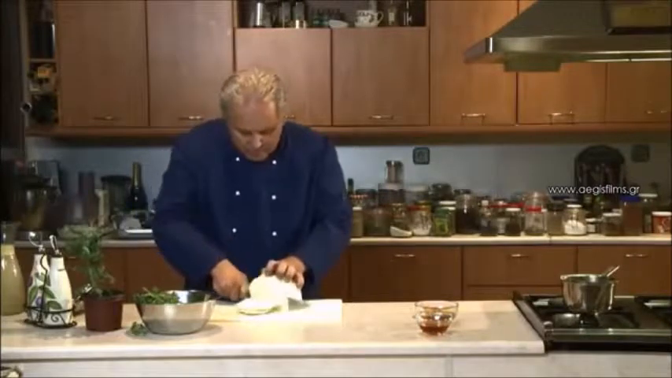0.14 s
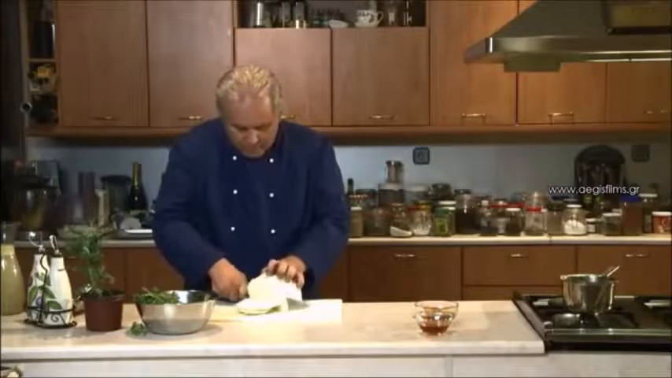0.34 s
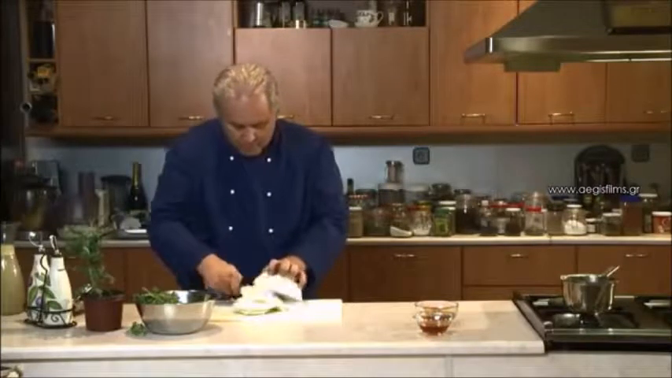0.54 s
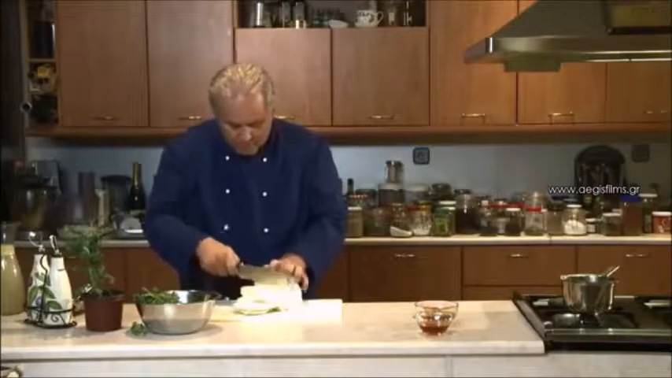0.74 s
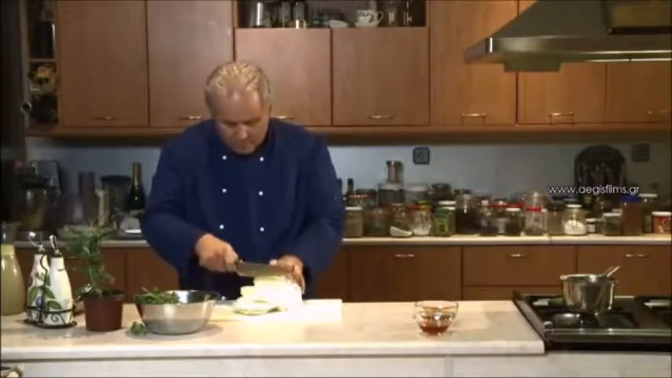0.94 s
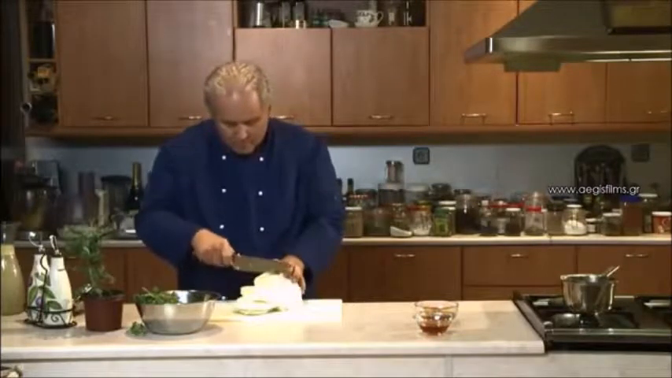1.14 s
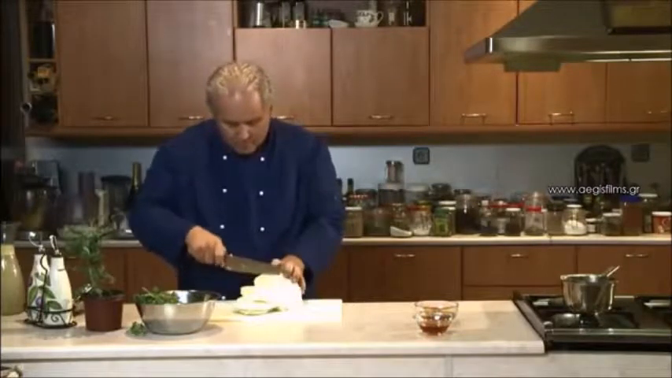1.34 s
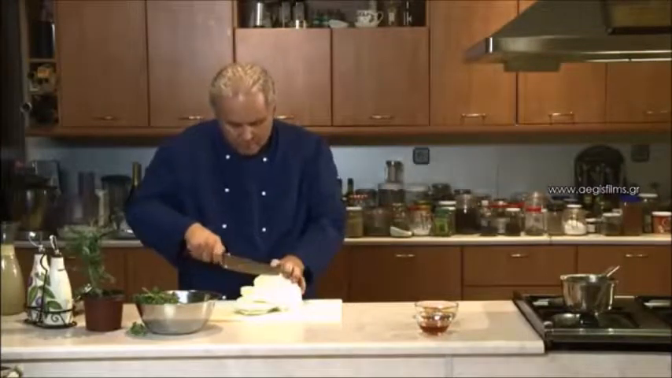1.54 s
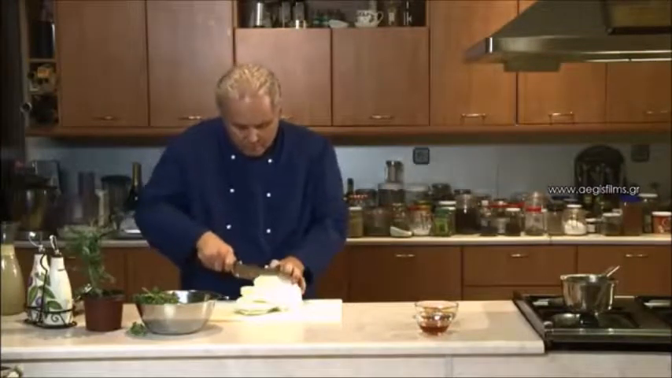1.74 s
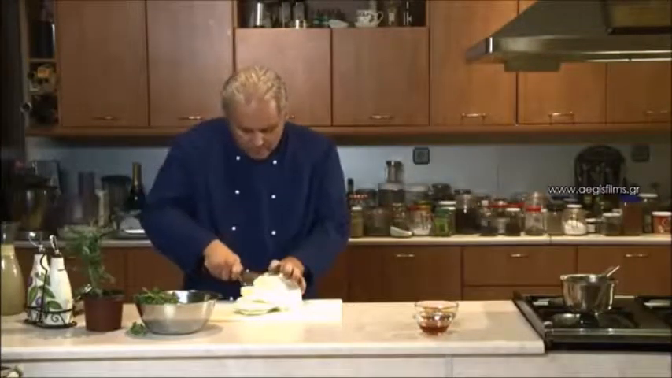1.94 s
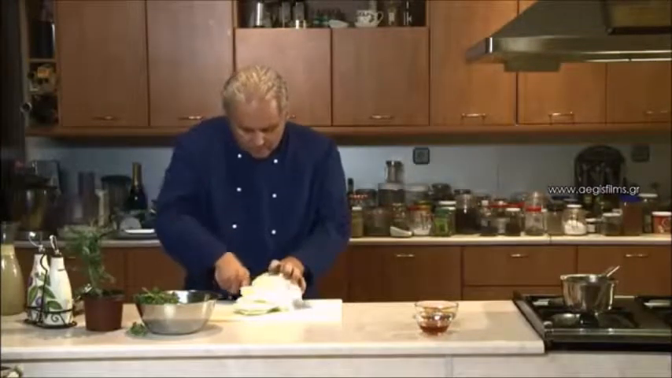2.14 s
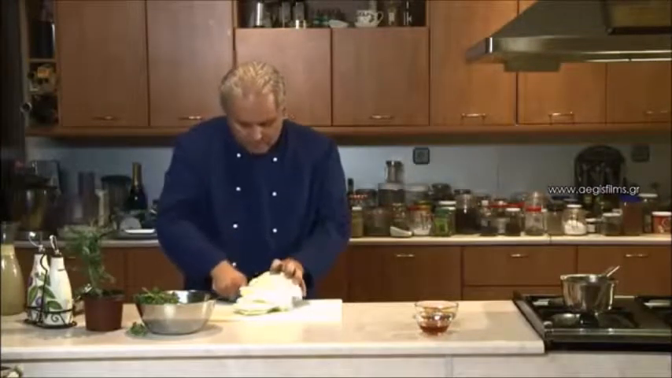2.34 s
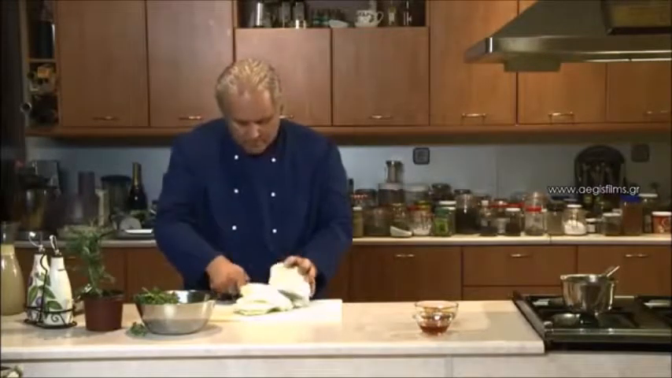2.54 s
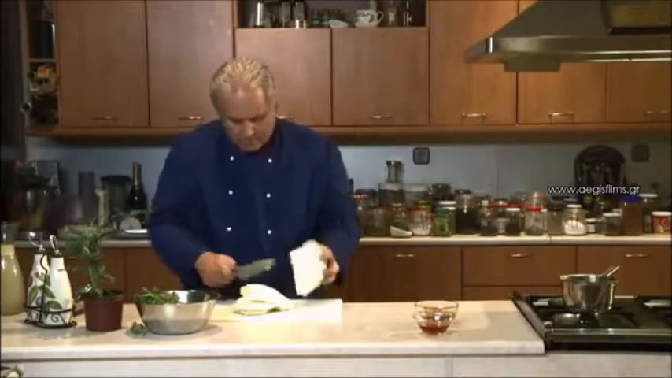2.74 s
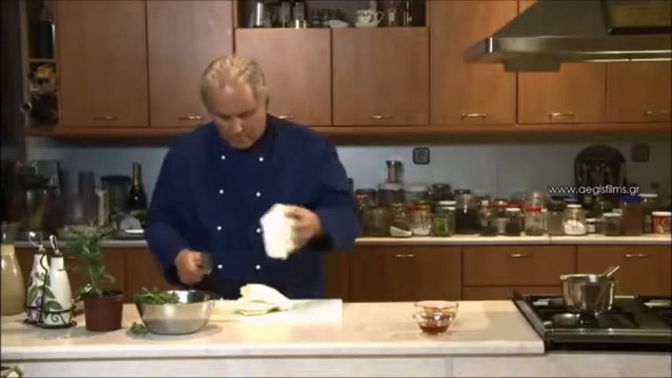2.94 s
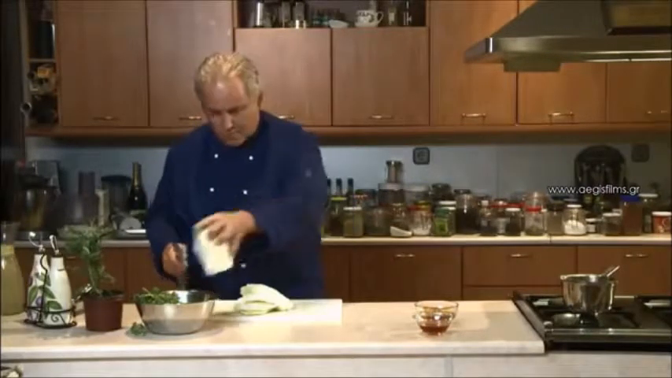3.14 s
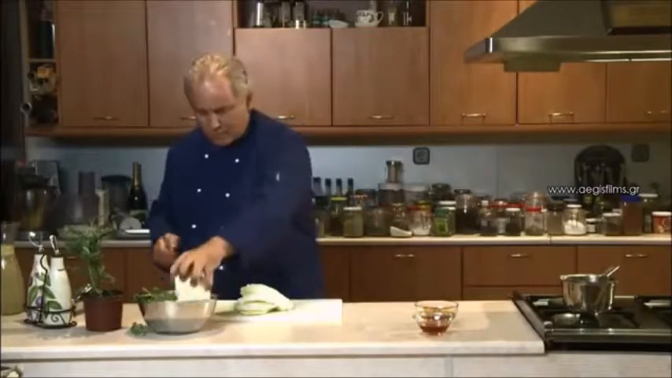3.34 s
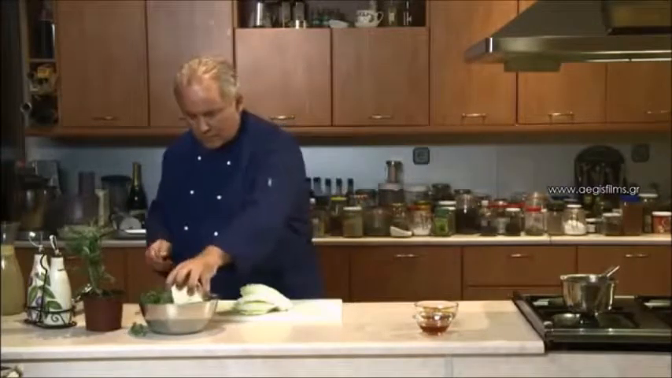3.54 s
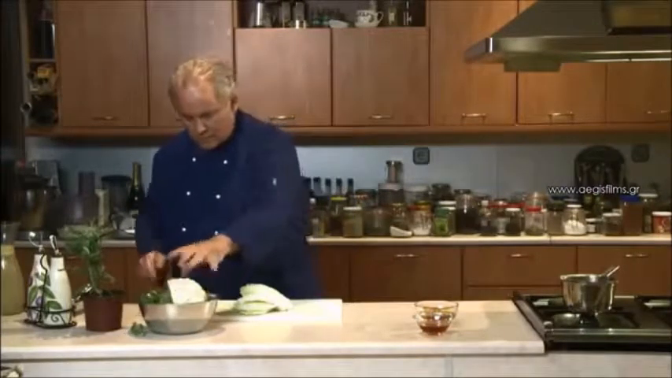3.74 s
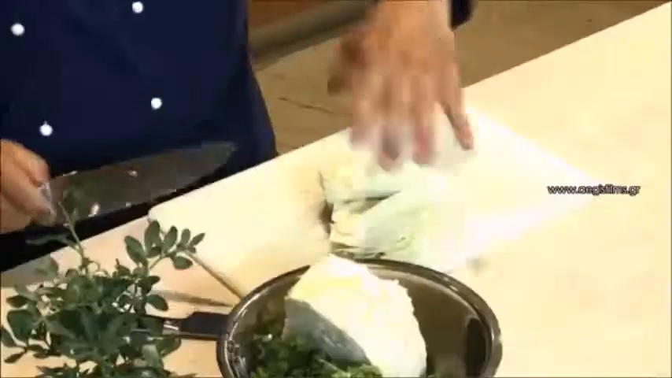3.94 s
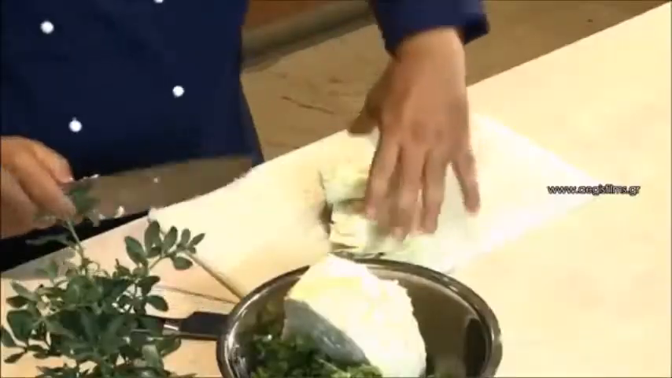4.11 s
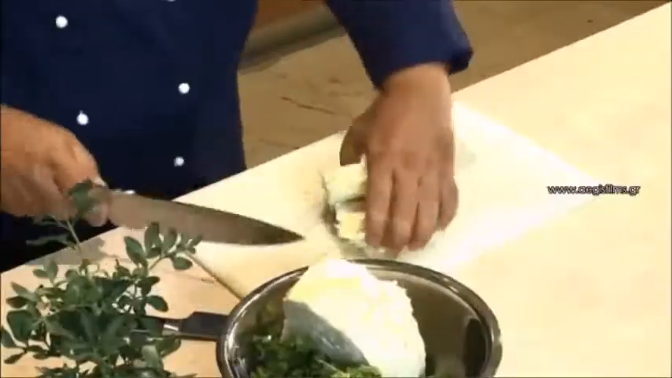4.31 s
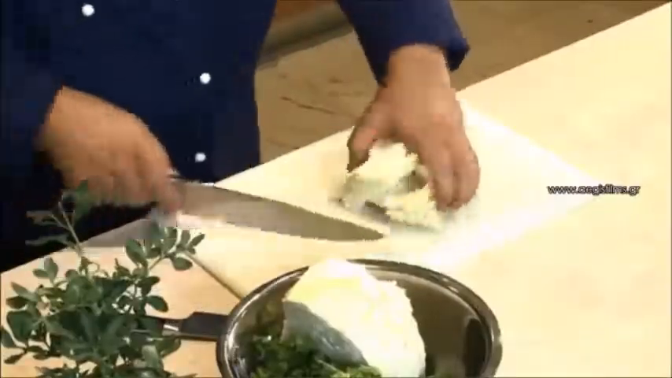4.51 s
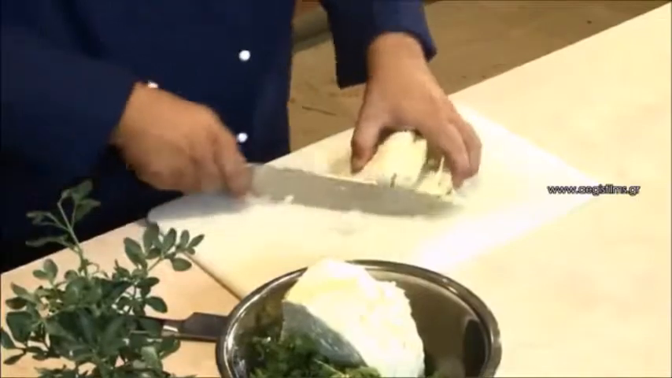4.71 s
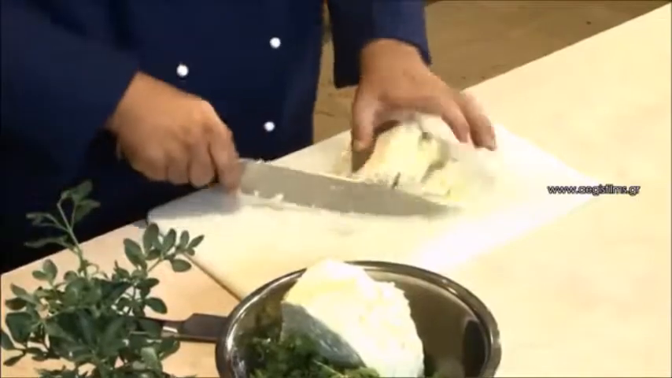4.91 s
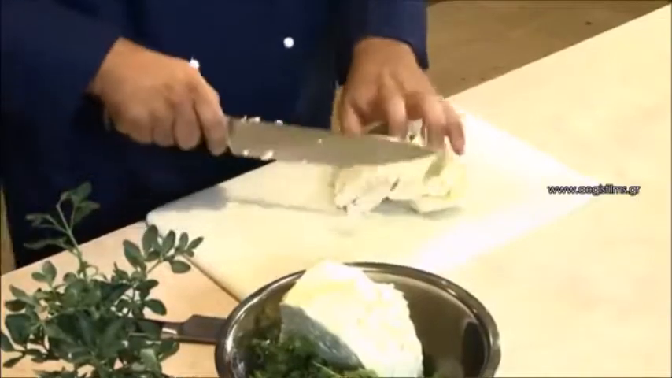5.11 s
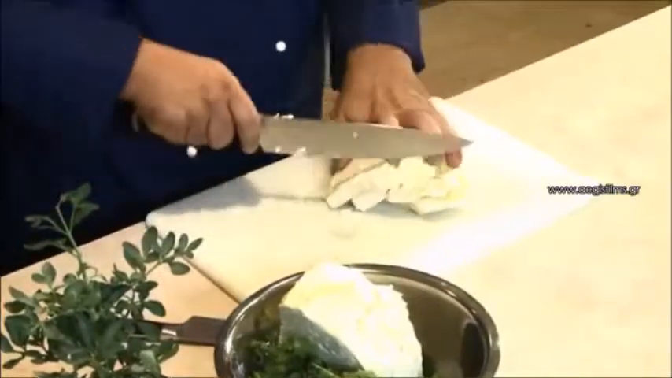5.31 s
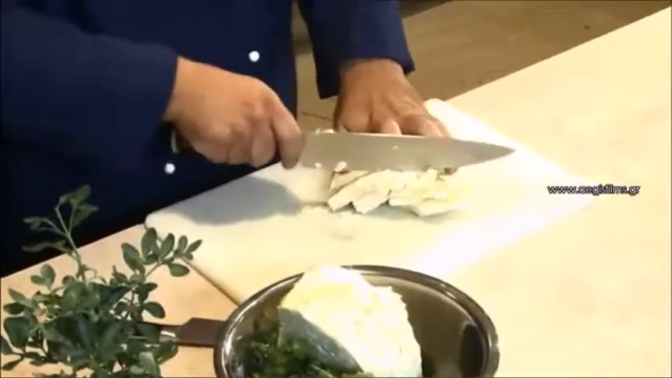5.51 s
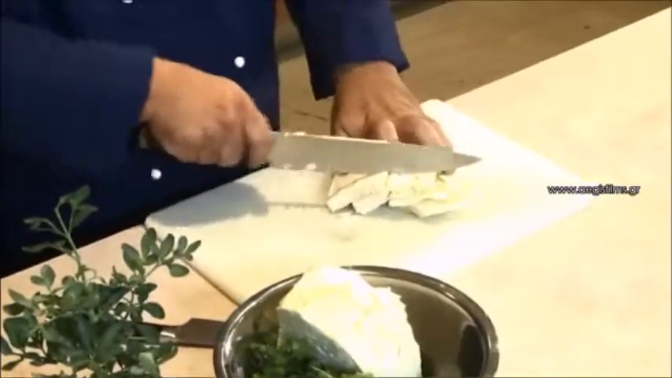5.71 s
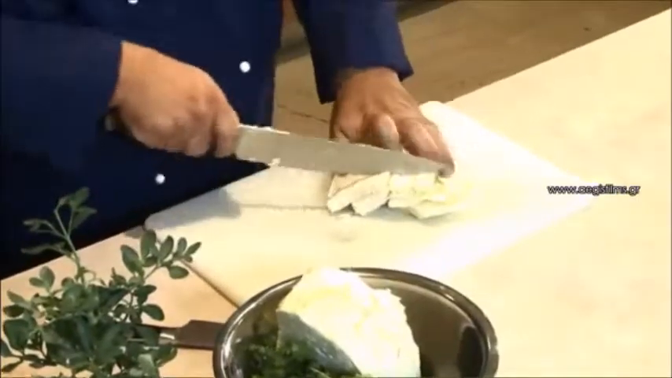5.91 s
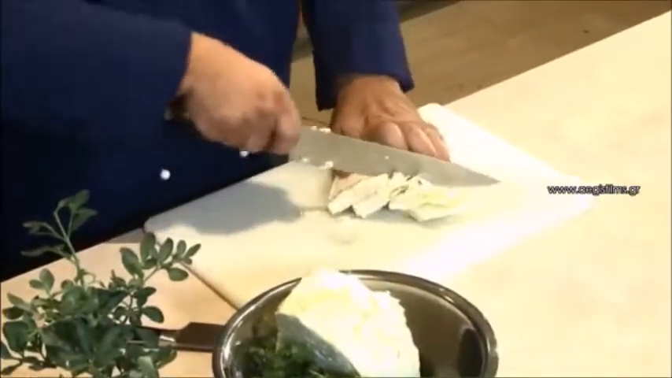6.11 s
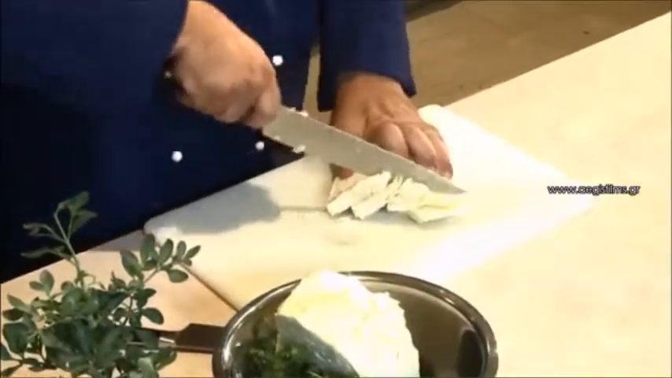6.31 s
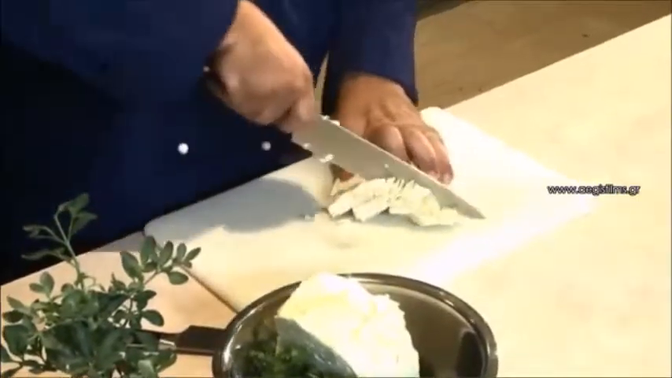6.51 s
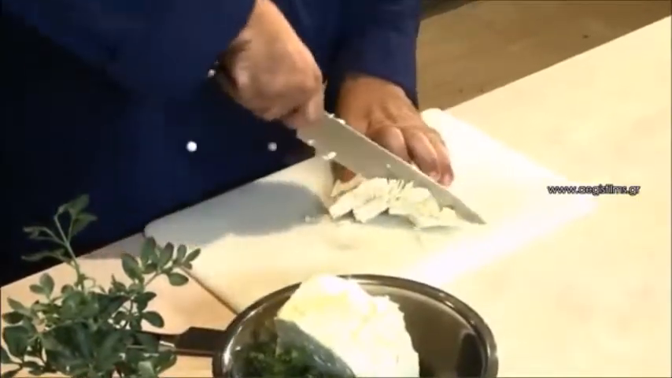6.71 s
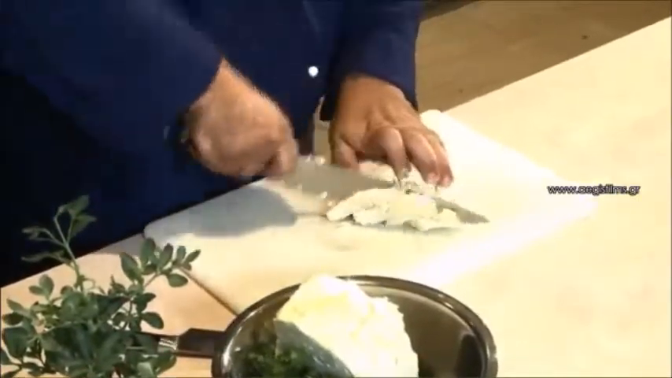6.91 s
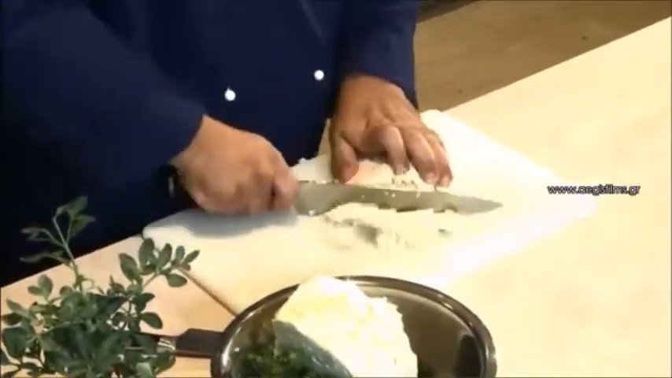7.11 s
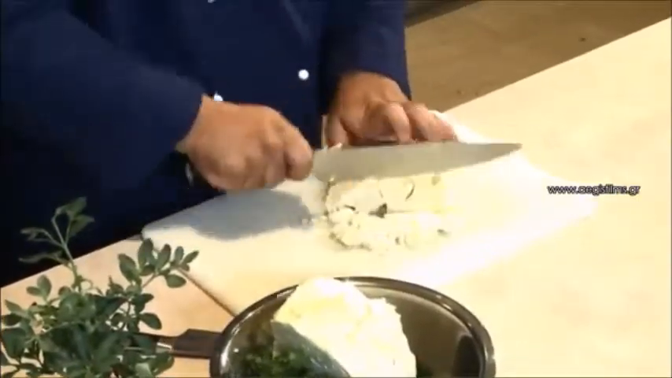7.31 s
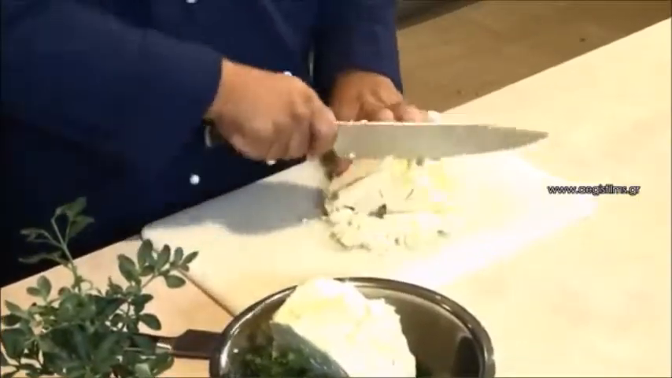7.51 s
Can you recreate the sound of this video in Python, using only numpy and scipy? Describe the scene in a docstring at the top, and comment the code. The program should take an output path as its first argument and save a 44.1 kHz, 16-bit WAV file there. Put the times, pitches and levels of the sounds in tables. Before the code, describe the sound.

A large knife tears crisply into a cabbage and knocks hard on the cutting board, then a longer crunching cut ends in a second, sharper knock. A chunk lands in a steel bowl with a dull, briefly ringing clunk. Lighter slicing follows, with leafy crackle, small snaps and soft bumps. One microphone in a reverberant kitchen hears steady low ventilation noise and faint hum.

```python
"""Crunching cuts through a cabbage, two knocks on a board, a chunk dropped in a steel bowl, lighter slicing.
Crackle, tearing, snaps and blade taps are filtered noise bursts; strokes pace the cutting. Knocks add a short
swing, board clicks and blade modes. The bowl is thuds, leaf crackle and decaying modes; bumps are tuned noise.
A lively kitchen adds echoes and a tail; ventilation noise, a faint hum and a low drone fill the room."""
import sys
import numpy as np
from scipy import signal
from scipy.fft import rfft, irfft
from scipy.io import wavfile

SR = 44100
rng = np.random.default_rng(int(sys.argv[2]) if len(sys.argv) > 2 else 0)


def to_wav(s):
    """Save 16-bit WAV."""
    ch = np.atleast_2d(s).T  # columns
    pcm = np.round(np.clip(ch, -1, 1) * 32767)  # PCM
    wavfile.write(sys.argv[1], SR, pcm.astype(np.int16))


N = 332955  # samples

# Ventilation spectrum. Each row: frequency in Hz, relative level in dB.
AIR_SPECTRUM = [(12, -41), (20, -10.5), (48, -3), (70, -12.5), (102, -9.5), (127, -12.5), (166, -5),
                (261, -10), (446, -11), (538, -14), (583, -16), (826, -17.5), (1230, -19), (4960, -41),
                (12000, -46), (15600, -80), (22000, -120)]
# Hum partials. Each row: frequency in Hz, rms level in dB.
HUM_PARTIALS = [(48.7, -63), (100, -71), (166.5, -67), (285, -68.5)]
# Room decay. Each row: frequency in Hz, t60 in seconds.
KITCHEN_T60 = [(100, 0.96), (300, 0.97), (600, 0.65), (1200, 0.64), (2500, 0.65), (5000, 0.58),
               (10000, 0.39)]
# Counter, cupboards and walls. Each row: delay in seconds, relative gain as a ratio.
ECHO_TAPS = [(.0047, .2), (0.0095, 0.3), (0.021, 0.23), (0.026, 0.11), (.058, .12)]
# Edge or hand moving through the leaves. Each row: start in seconds, length in seconds, relative crackle
# at the start in dB, at the end in dB, tearing over crackle in dB before the lean, vein snaps over crackle in dB.
STROKE_TABLE = [ (-0.03, 0.23, -54, -54.5, 5, 20), (0.476, 0.14, -62, -67, 4, 19),
                (1.65, 0.64, -54, -52.5, 3.5, 22), (3.122, 0.26, -71.5, -74.5, 4.5, 20),
                (4.122, 0.72, -73.5, -61.5, 5, 25.5), (4.684, 0.13, -67, -62.5, -16, 30),
                (5.39, 0.061, -69, -53, 0, 18), (5.571, 0.14, -63, -63.5, 2, 25),
                (5.712, 0.39, -58, -72, 3, 22), (6.031, 0.46, -55, -60, -1, 22),
                (6.52, 0.15, -53, -48.5, -5, 20), (6.69, 0.1, -72, -65, -2, 22),
                (6.88, 0.21, -57, -44, 3.5, 22), (7.145, 0.21, -73, -65, 2.5, 24)]
# Thick ribs snapping; at 4.66 and 4.71 s the knife blade taps the board. Each row: start in seconds,
# level in dB before SNAP_GAIN_DB, tearing-coloured part over crackle part in dB, ring pitch in Hz.
SNAP_TABLE = [(0.4928, -44, 10, 3320), (0.5364, -37, 11, 3320), (1.4351, -47, 3, 9870),
              (1.755, -36, -2, 8950), (1.763, -34, -2, 9040), (1.7714, -33, -2, 8850),
              (1.7878, -40, -9, 3000), (1.7941, -27, 1, 7740), (1.956, -34.5, -2, 3240),
              (4.6138, -41.5, -2, 3250), (4.6636, -41.5, -7, 8070), (4.706, -38, -15, 4270),
              (4.8618, -37, 1, 8800), (4.9931, -48, 7, 3820), (5.5877, -44, 1, 5860),
              (5.652, -41, -5, 7840), (5.7952, -41.5, 5, 4190), (6.4388, -33.5, -6, 9850),
              (6.4422, -34, 2, 8900), (6.4768, -42, -4, 3200), (6.5593, -43, -7, 3300),
              (6.68, -39, -1, 9350), (6.8949, -35.5, -3, 9300), (6.9183, -36, -3, 9400),
              (7.0464, -34, 6, 3260), (7.078, -40, 0, 3230)]
# Leaf crackle spectrum. Each row: frequency in Hz, relative level in dB.
CRACKLE_SPECTRUM = [(1500, -17), (3500, -1.5), (5000, -1.5), (7000, -1), (9000, 4.5), (10500, 0),
                    (12000, -4)]
# Leaf tearing spectrum. Each row: frequency in Hz, relative level in dB.
TEARING_SPECTRUM = [(100, -32), (300, -4), (700, -3), (1700, 1.5), (2400, 2), (3400, -1), (5000, -7),
                    (7000, -12.5), (11000, -14.5)]
# Blade breaking through to the board. Each row: start in seconds, relative blow in dB, clack over board
# in dB, relative blade chatter in dB, downward push as a share of the swing, swing pitch in Hz.
KNOCK_TABLE = [(0.2096, 8.5, -12, -11, 0.02, 700), (2.2558, 11, -4, -24, 0.11, 790)]
# Board body spectrum. Each row: frequency in Hz, relative level in dB.
BOARD_SPECTRUM = [(30, -47), (100, -23.5), (160, -16.5), (350, -11.5), (500, -3.5), (620, -2), (850, -0.5),
                  (1150, -6), (1600, -5.5), (2400, -16.5), (3500, -33.5), (6000, -44.5), (12000, -56)]
# Hard clack spectrum. Each row: frequency in Hz, relative level in dB.
CLACK_SPECTRUM = [(500, -25), (1400, 1), (2300, -1), (3300, -11.5), (5000, -24), (12000, -25)]
# Edge-on-board crack spectrum. Each row: frequency in Hz, relative level in dB.
CRACK_SPECTRUM = [(500, -2), (1500, -7), (2200, 14.5), (3500, -13.5), (6000, -18), (9000, -21),
                  (12000, -47)]
# Steel blade modes. Each row: frequency in Hz, relative level in dB, t60 in seconds.
BLADE_MODES = [(4122, -9, .3), (5198, -9, .42), (6468, -14, .35), (7337, -4, .15), (7696, -5, .24),
               (9070, 0, .1), (9170, -3, .16), (9862, -7, .14), (10750, -8, .18), (11400, -2, .09),
               (11560, -1, .09)]
# Chunk landing in the bowl. Each row: start in seconds, relative thud in dB, relative bowl ring in dB,
# relative leaf crackle in dB, contact decay time in seconds.
DROP_TABLE = [(3.44, -44, -29, -28.5, 0.0035), (3.467, -14, -28, -34, 0.016),
              (3.485, -4.5, -10.5, -19, 0.0086), (3.56, -11.5, -19, -18, 0.0093),
              (3.595, 6.5, -7.5, -8.5, 0.0057), (3.6032, 6.5, 6, -10.5, 0.0067)]
# Chunk thud spectrum. Each row: frequency in Hz, relative level in dB.
CHUNK_SPECTRUM = [(30, -53), (70, -23), (140, -13), (220, -2.5), (310, -0.5), (400, -7), (600, -2.5),
                  (800, -5), (1050, -6.5), (1700, -10.5), (2200, -21.5), (3200, -27), (4700, -47),
                  (12000, -49)]
# Steel bowl modes. Each row: frequency in Hz, relative level in dB, t60 in seconds before leaf damping.
BOWL_MODES = [(229, -4, .45), (260, -9, .3), (319, -3, .4), (369, -7, .3), (598, -4, .45), (621, 0, .45),
              (1094, 0, .25), (1254, -7, .28), (1421, -3, .28), (1645, -6, .28), (4330, -14, .04),
              (6072, -9, .09), (7644, -12, .06), (8156, -11, .07), (9168, -10, .05), (11440, -7, .06)]
# Soft bumps on the board. Each row: start in seconds, relative level in dB, decay time in seconds,
# pitch in Hz, tone width as a ratio.
BUMP_TABLE = [(4.744, -15.5, .025, 300, 3.3), (4.769, -19, 0.015, 840, 1.8), (5.182, -13, 0.011, 930, 1.6),
              (6.677, -18, 0.013, 453, 4.3), (6.919, -8, 0.02, 416, 1.9), (6.996, -7.5, 0.018, 604, 1.4),
              (7.045, -7.5, 0.018, 710, 2.16), (7.05, -14.5, .033, 235, 1.47)]

AIR_RMS_DB = -54.5
DRONE_HZ, DRONE_RMS_DB, DRONE_HOLD_S = 36.2, -56, 0.92
DRONE_FADE_DB_PER_S, DRONE_REST_RMS_DB = 11, -83
BITE_SHARE, RELEASE_S = 0.15, 0.019  # share of a stroke spent sinking in; decay after it
LEAN_DB, LEAN_S = 10.5, 0.072  # extra tearing as the cook leans on the knife; decay either side of a knock
SNAP_GAIN_DB, SNAP_DECAY_S = 12.5, 0.0021
SNAP_RING_DB, SNAP_RING_DECAY_S = -5.5, 0.0021  # level against the crackle part
VEINS_PER_S, VEIN_SPREAD_DB, VEIN_DEEP_DB, VEIN_RANGE_HZ = 30, 3, -7.5, (3000, 11250)
THUMP_HZ, THUMP_WIDTH_RATIO = 275, 1.55
THUMP_DB, THUMP_DECAY_S = -4.5, 0.0094  # level against the thud
LEAF_DAMPING_DB_PER_S = 40
CEILING, CUTOFF_HZ = 0.44, 11920


def amp(db):
    """Decibels to gain."""
    return 10 ** (np.asarray(db) / 20)


def evened(x):
    """Scales to rms 1."""
    return x / np.sqrt(np.mean(x ** 2) + 1e-20)


def unit(x):
    """Scales to energy 1."""
    return x / (np.linalg.norm(x) + 1e-20)


def read(points, hz):
    """Interpolates a table on a log-frequency axis."""
    table_hz, value = np.transpose(points)
    return np.interp(np.log(hz + 1), np.log(table_hz + 1), value)


def add(mix, start_s, sound):
    """Mixes a sound in at start_s, cut at the end of the mix."""
    part = mix[max(round(start_s * SR), 0):][:len(sound)]
    part += sound[:len(part)]


def through(x, response):
    """Passes x through an impulse response."""
    return signal.fftconvolve(x, response)[:N]


def click(spectrum, size=4096):
    """Minimum-phase click with this spectrum: its energy comes as early as possible."""
    log_gain = np.log(amp(read(spectrum, abs(np.fft.fftfreq(size, 1 / SR)))))
    minimum_phase = np.exp(np.conj(signal.hilbert(log_gain)))
    return unit(np.fft.ifft(minimum_phase).real[:size // 2])


def burst(decay_s):
    """Ragged contact: exponentially decaying noise."""
    t = np.arange(0, 6 * decay_s, 1 / SR)
    return unit(rng.standard_normal(len(t)) * np.exp(-t / decay_s))


def ring(modes):
    """Struck object: decaying sine modes with random phases."""
    t = np.arange(SR // 2) / SR
    out = np.zeros(len(t))
    for hz, db, t60_s in modes:
        out += amp(db - 60 * t / t60_s) * np.sin(2 * np.pi * (hz * t + rng.random()))
    return unit(out)


def kitchen(wet_db, early_db):
    """Room response: a few distinct echoes and a dense noise tail whose treble dies first."""
    hz, t, bins = signal.stft(rng.standard_normal(SR), SR, nperseg=256)
    decay = amp(-60 * t / read(KITCHEN_T60, hz)[:, None])
    tail = signal.istft(bins * decay, SR, nperseg=256)[1]
    fade_in = np.minimum(np.arange(len(tail)) / SR / 0.0048, 1)
    tail = amp(wet_db) * unit(tail * fade_in)
    for delay_s, gain in ECHO_TAPS:
        add(tail, delay_s, np.array([gain * amp(early_db)]))
    return tail


def room_tone():
    """Shaped ventilation noise, a phase-wavering hum and a low drone that holds, then sinks to a faint rest."""
    t = np.arange(N) / SR
    gain = amp(read(AIR_SPECTRUM, np.fft.rfftfreq(N, 1 / SR)))
    air = evened(irfft(rfft(rng.standard_normal(N)) * gain, N))
    out = amp(AIR_RMS_DB) * air
    knots_s = np.linspace(0, t[-1], num=30)
    for hz, db in HUM_PARTIALS:
        waver = np.interp(t, knots_s, rng.standard_normal(len(knots_s)))
        out += amp(db) * np.sqrt(2) * np.sin(2 * np.pi * hz * t + 0.5 * waver)
    fade_db = DRONE_FADE_DB_PER_S * np.maximum(t - DRONE_HOLD_S, 0)
    drone_db = np.maximum(DRONE_RMS_DB - fade_db, DRONE_REST_RMS_DB)
    return out + amp(drone_db) * np.sqrt(2) * np.sin(2 * np.pi * DRONE_HZ * t)


def strokes():
    """Crackle, tearing and vein strengths: each stroke bites in, swells or eases steadily, and lets go."""
    crisp, deep, veins = np.zeros(N), np.zeros(N), np.zeros(N)
    t = np.arange(N) / SR
    for start_s, length_s, start_db, end_db, tear_db, vein_db in STROKE_TABLE:
        progress = np.clip((t - start_s) / length_s, 0, 1)
        bite = np.minimum(progress / BITE_SHARE, 1) ** 2
        release = np.exp(-np.maximum(t - start_s - length_s, 0) / RELEASE_S)
        level = bite * release * amp(start_db + (end_db - start_db) * progress)
        crisp += level
        deep += level * amp(tear_db)
        veins += level * amp(vein_db)
    lean = sum(np.exp(-abs(t - knock_s) / LEAN_S) for knock_s, *_ in KNOCK_TABLE)
    return crisp, deep * amp(LEAN_DB * lean), veins


def cells(per_s, spread_db, decay_s, count=16):
    """Bursting plant cells: random tiny cracks in count shapes, sizes spread exponentially in dB."""
    out = np.zeros(N)
    for _ in range(count):
        hits = rng.random(N) < per_s / count / SR
        sizes = amp(spread_db * np.minimum(rng.exponential(1, N), 4)) * hits
        out += signal.oaconvolve(sizes, burst(decay_s))[:N]
    return out


def layers(per_s, depth_db):
    """Leaf after leaf gives way: random level knots make the crunch clump unevenly."""
    t = np.arange(N) / SR
    knots_s = np.cumsum(rng.exponential(1 / per_s, 2000))
    toughness = rng.uniform(-1, 1, len(knots_s))
    return evened(amp(depth_db * np.interp(t, knots_s, toughness)))


def snap(deep_db, hz):
    """A rib or vein gives way, or the blade taps the board: a ragged crack with a brief ring."""
    crack = click(CRACKLE_SPECTRUM) + amp(deep_db) * click(TEARING_SPECTRUM)
    t = np.arange(len(crack)) / SR
    ping = unit(np.sin(2 * np.pi * hz * t) * np.exp(-t / SNAP_RING_DECAY_S))
    return unit(through(burst(SNAP_DECAY_S), crack + amp(SNAP_RING_DB) * ping))


def cutting():
    """The edge bursts cells and tears leaves; veins and ribs snap singly, and the blade taps the board."""
    crisp, deep, veins = strokes()
    crackle = cells(per_s=2200, spread_db=1.5, decay_s=0.00033)
    out = amp(-3) * crisp * evened(through(crackle, click(CRACKLE_SPECTRUM)))
    tearing = cells(per_s=1300, spread_db=-0.5, decay_s=0.001)
    out += amp(-3) * deep * evened(through(tearing, click(TEARING_SPECTRUM)))
    pressure = np.sqrt(deep / deep.max())  # a hard push carries the tearing into the board
    pressed = cells(per_s=900, spread_db=0.5, decay_s=0.00093)
    board = evened(through(pressed, click(BOARD_SPECTRUM) + click(CLACK_SPECTRUM)))
    out += amp(-3) * pressure * deep * board
    out *= layers(per_s=110, depth_db=5.5)
    for start_s, db, deep_db, hz in SNAP_TABLE:
        add(out, start_s, amp(db + SNAP_GAIN_DB) * snap(deep_db, hz))
    # thin veins: random times, strength following the strokes
    for when, size, pitch in rng.random((round(VEINS_PER_S * N / SR), 3)):
        strength = veins[int(when * N)] * amp(VEIN_SPREAD_DB * (2 * size - 1.5))
        hz = np.interp(pitch, [0, 1], VEIN_RANGE_HZ)
        add(out, when * N / SR, strength * snap(VEIN_DEEP_DB, hz))
    return out + through(out, kitchen(wet_db=-6, early_db=-9.5))


def knocks(swing_s=0.0027, ring_delay_s=0.0035):
    """The board gives a short, heavy swing; the room answers and the blade chatters and rings in the cut."""
    out = np.zeros(N)
    t = np.arange(0, swing_s, 1 / SR)
    contact = np.sqrt(abs(np.sin(np.pi * t / swing_s))) * np.exp(-t / swing_s)
    for start_s, db, hard_db, blade_db, push, swing_hz in KNOCK_TABLE:
        swing = -contact * (np.sin(2 * np.pi * swing_hz * t) + push)  # one-way push: low thump
        blow = amp(db) * (click(BOARD_SPECTRUM) + amp(hard_db) * click(CLACK_SPECTRUM))
        crack = unit(through(burst(0.0038), click(CRACK_SPECTRUM)))
        add(out, start_s, amp(db - 11.5) * swing)
        add(out, start_s, amp(-8) * blow)
        add(out, start_s, amp(db - 4 + hard_db / 2) * crack)
        add(out, start_s, through(blow, kitchen(wet_db=0.5, early_db=-12)))
        chatter = amp(blade_db) * unit(through(burst(0.0047), click(CRACKLE_SPECTRUM)))
        ring_s = start_s + ring_delay_s
        add(out, ring_s, chatter)
        add(out, ring_s, through(chatter, kitchen(wet_db=-7.5, early_db=1)))
        add(out, ring_s, amp(blade_db - 1) * ring(BLADE_MODES))
    return out


def bowl():
    """Each contact of the chunk thuds, crushes outer leaves and rings the steel, which the leaves damp."""
    out, steel = np.zeros(N), np.zeros(N)
    t = np.arange(SR // 2) / SR
    hz, width = THUMP_HZ, THUMP_WIDTH_RATIO
    soft_mass = click([(hz / width ** 3, -36), (hz / width, -8), (hz, 0), (hz * width, -5),
                       (hz * width ** 5, -60)])
    for start_s, thud_db, ring_db, leaf_db, decay_s in DROP_TABLE:
        thud = unit(through(burst(decay_s), click(CHUNK_SPECTRUM)))
        thump = unit(through(burst(THUMP_DECAY_S), soft_mass))
        leaves = unit(through(burst(2 * decay_s), click(CRACKLE_SPECTRUM)))
        add(out, start_s, amp(thud_db) * thud)
        add(out, start_s, amp(thud_db + THUMP_DB) * thump)
        add(out, start_s, amp(leaf_db) * leaves)
        damped_gain = amp(ring_db + 1.5 - LEAF_DAMPING_DB_PER_S * t)
        add(steel, start_s, damped_gain * ring(BOWL_MODES))
    wet = through(out + amp(-13) * steel, kitchen(wet_db=-6.5, early_db=-2))
    return steel + amp(-2) * out + wet


def bumps():
    """Cabbage and knife bump softly on the board: noise bursts through a broad, dull resonance."""
    out = np.zeros(N)
    for start_s, db, decay_s, hz, width in BUMP_TABLE:
        colour = [(hz / width ** 4, -26), (hz / width, -7), (hz, 0), (hz * width, -13),
                  (hz * width ** 3, -52)]
        add(out, start_s, amp(db) * unit(through(burst(decay_s), click(colour))))
    return amp(-5.5) * out + through(out, kitchen(wet_db=-6, early_db=-15))


def scene():
    """Sums all sources at one microphone."""
    return (room_tone() + cutting() + knocks() + bowl() + bumps())[None]


def record(dry):
    """Input overload as a smooth amplitude ceiling, then a low-pass band limit."""
    clipped = dry / (1 + (dry / CEILING) ** 6) ** (1 / 6)
    lowpass = signal.firwin(1023, CUTOFF_HZ, window=("kaiser", 9), fs=SR)
    return signal.oaconvolve(clipped, lowpass[None], "same")


dry = scene()
out = record(dry)
to_wav(out)
```